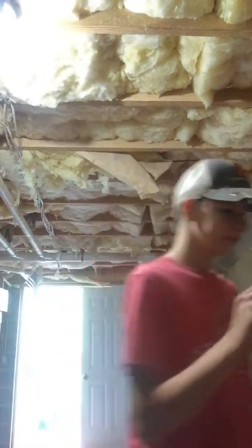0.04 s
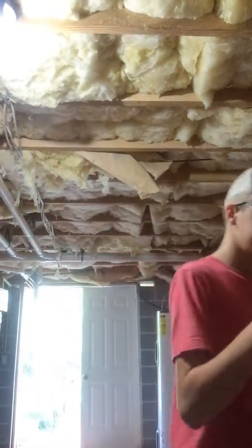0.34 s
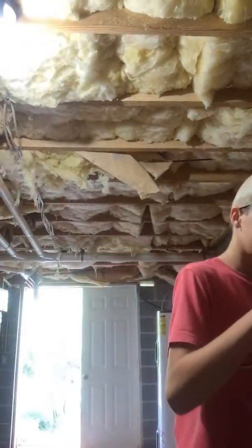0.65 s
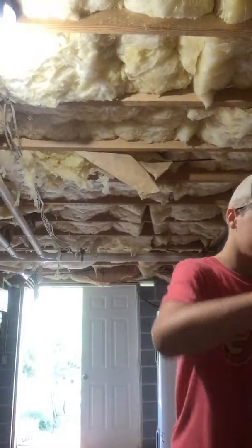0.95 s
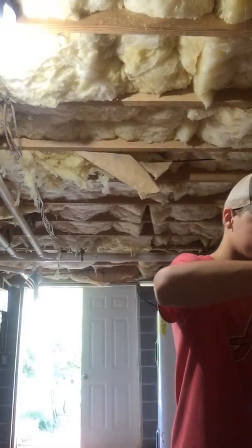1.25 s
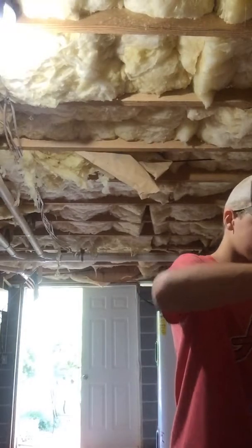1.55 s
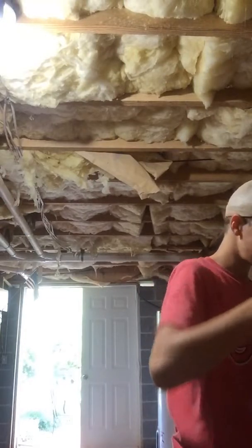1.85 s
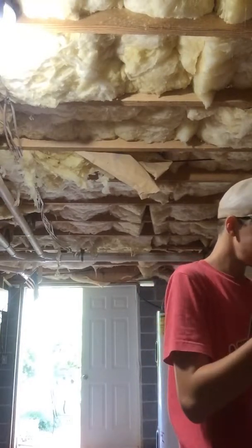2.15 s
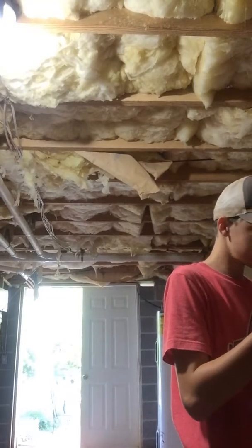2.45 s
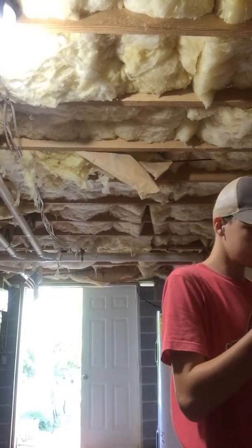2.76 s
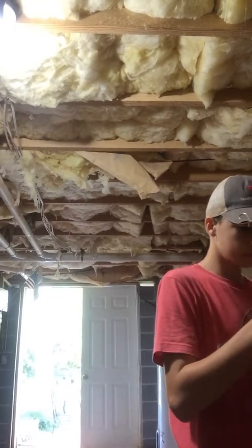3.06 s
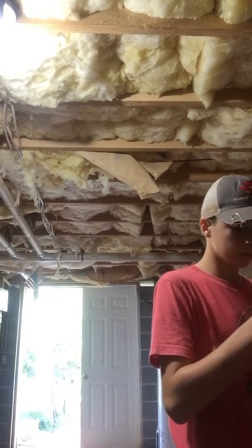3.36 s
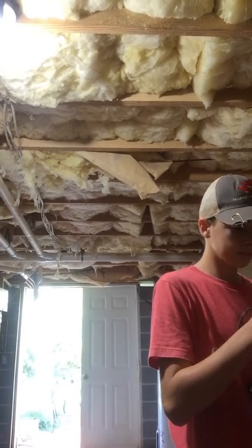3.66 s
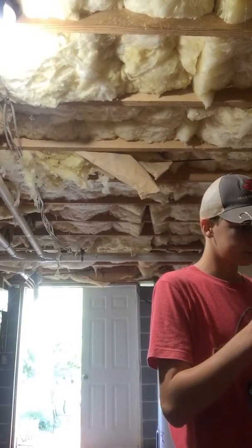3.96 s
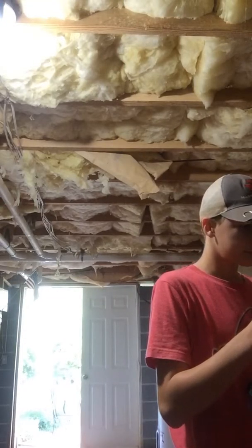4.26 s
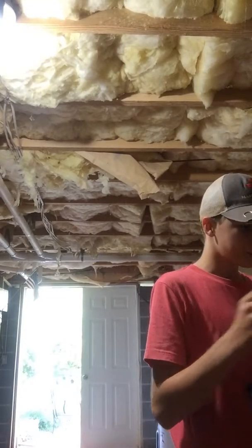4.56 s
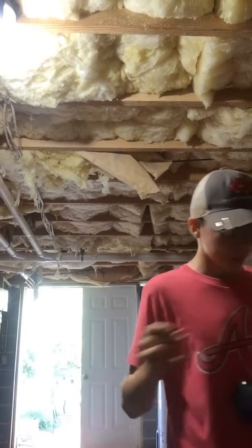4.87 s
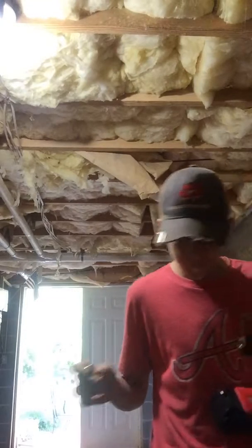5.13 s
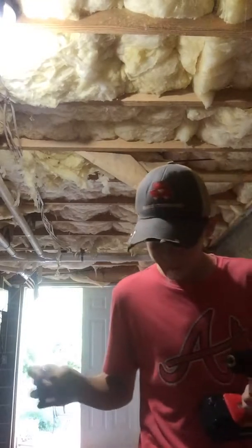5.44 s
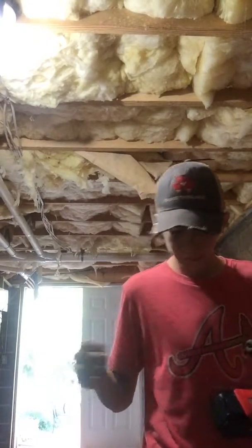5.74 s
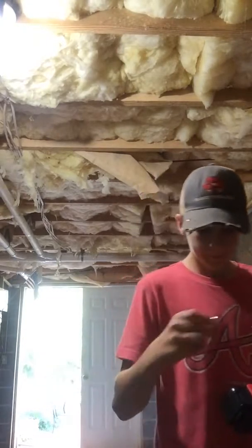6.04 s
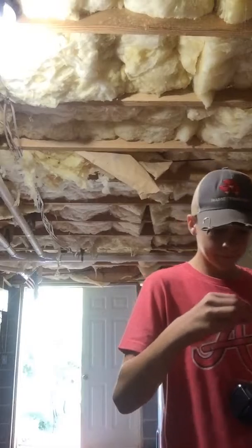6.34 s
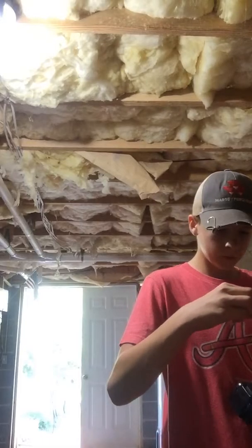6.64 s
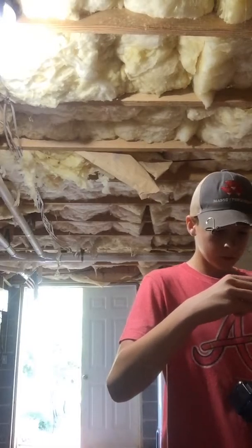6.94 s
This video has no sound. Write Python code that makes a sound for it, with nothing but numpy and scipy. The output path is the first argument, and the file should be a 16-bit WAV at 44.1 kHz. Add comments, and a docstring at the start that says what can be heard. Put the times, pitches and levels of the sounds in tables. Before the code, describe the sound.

Someone rummages briefly through steel tools, with scattered light clicks, one solid thunk on a workbench and a ringing wrench clack.

```python
"""A toolbox is knocked and rummaged in a small basement workshop, an arm's length from a phone.
Steel sockets clink, a wrench and a handle clack, small parts tick, and one heavy tool lands on the bench.
Each blow is a damped knock plus the object's ringing modes; small parts only knock.
Sliding, scraping and rustling are dense friction slips; shifted weight thuds softly.
The insulated ceiling keeps the reverb short, over faint hiss and mains hum."""
import sys
import numpy as np
from scipy import signal
from scipy.fft import rfft, irfft
from scipy.io import wavfile

SR = 44100
rng = np.random.default_rng(int(sys.argv[2]) if len(sys.argv) > 2 else 0)


def log_audio(samples):
    """Write samples as a 16-bit WAV file to the path given in sys.argv[1]."""
    # one column per channel
    frames = np.atleast_2d(samples).T
    # limit to full scale, then quantise
    limited = np.clip(frames, -1, 1)
    pcm = np.round(limited * 32767).astype(np.int16)
    wavfile.write(sys.argv[1], SR, pcm)


N = 308660
BLOW_N = 16384
TIME_S = np.arange(N) / SR
AGE_S = np.arange(BLOW_N) / SR


def undb(db):
    """Decibels to gain."""
    return 10 ** (np.asarray(db) / 20)


def unit(x):
    """Scale to unit energy."""
    return x / np.sqrt(np.sum(x ** 2))


def add(out, time_s, x):
    """Mix x in at time_s."""
    i = max(int(time_s * SR), 0)
    out[i:i + len(x)] += x[:max(N - i, 0)]


def bins_hz(size=BLOW_N):
    """FFT bin frequencies, floored at 1 Hz."""
    return np.maximum(np.arange(size // 2 + 1) * SR / size, 1)


def colour(spectrum, size=BLOW_N):
    """Gain per bin from (Hz, dB) points."""
    hz, db = np.transpose(spectrum)
    return undb(np.interp(np.log(bins_hz(size)), np.log(np.sort(hz)), db))


def resonance(hz, width_oct):
    """Gain per bin of one peak with steep skirts."""
    return 1 / (1 + (np.log2(bins_hz() / hz) / width_oct) ** 2 / 2) ** 2


def min_phase(x, gain):
    """Minimum-phase filter: ringing follows the blow."""
    cepstrum = irfft(np.log(gain + 1e-9))
    cepstrum[1:BLOW_N // 2] *= 2
    cepstrum[BLOW_N // 2 + 1:] = 0
    return irfft(rfft(x) * np.exp(rfft(cepstrum)))


def decay(t60_s):
    """Exponential decay."""
    return np.exp(-np.log(1000) * AGE_S / t60_s)


def contact(crack_db, room_db, chatter_db=2, split_hz=3000):
    """Crack with brief chatter, nearby scatter and a room tail whose treble dies first."""
    chatter, near, far = rng.standard_normal((3, BLOW_N))
    crack = unit((AGE_S == 0) + undb(chatter_db) * unit(chatter * decay(t60_s=0.016)))
    scatter = unit(near * decay(t60_s=0.04))
    low = irfft(rfft(far) / (1 + (bins_hz() / split_hz) ** 2))
    tail = low * decay(t60_s=0.18) + (far - low) * decay(t60_s=0.11)
    room = unit(tail * (1 - decay(t60_s=0.018)))
    return undb(crack_db) * crack + unit(undb(room_db) * room + scatter)


# Bench top, wall and joist reflections: (delay [s], level [dB])
ECHOES = [(.0068, -14), (0.0111, -13), (0.0191, -17.5)]

def knock(body_gain, crack_db, room_db):
    """One contact through a damped body, with early echoes; energy of 10 ms at unit rms."""
    comb = 1 + sum(undb(db) * np.exp(-2j * np.pi * bins_hz() * delay_s) for delay_s, db in ECHOES)
    direct = min_phase(contact(crack_db, room_db), body_gain)
    return unit(irfft(rfft(direct) * comb)) * np.sqrt(SR / 100)


def struck(blows, body, modes, room_db, detune=0.00058):
    """Knock plus ringing modes per blow; softer contact (lower cutoff) dulls both."""
    out = np.zeros(N)
    for time_s, db, cutoff_hz, ring_db, crack_db in blows:
        body_gain = colour(body) / np.hypot(1, (bins_hz() / cutoff_hz) ** 2)
        sound = knock(body_gain, crack_db, room_db)
        for k, (hz, mode_db, t60_s) in enumerate(modes):
            cycles = hz * (1 + detune * rng.standard_normal()) * AGE_S
            ring = np.sin(2 * np.pi * cycles) * (1 - np.exp(-2 * cycles)) * decay(t60_s)
            gain = undb(ring_db + mode_db) / np.hypot(1, (hz / cutoff_hz) ** 2)
            sound += (-1) ** k * gain * ring  # alternate signs: close pairs swell and beat
        add(out, time_s, undb(db) * sound)
    return out


def effort(strokes, attack_s, release_s, sag_db_per_s):
    """Stroke force: swell, sag, release; attack and release times span 20 dB."""
    force = np.zeros(N)
    for peak_s, length_s, db in strokes:
        before = np.maximum(peak_s - TIME_S, 0) / attack_s
        after = np.maximum(TIME_S - peak_s - length_s, 0) / release_s
        sag_db = sag_db_per_s * np.clip(TIME_S - peak_s, 0, length_s)
        force += undb(db - sag_db - 20 * (before + after))
    return force


def friction(force, spectrum, grit_db, slips_per_s):
    """Dense, uneven slips excite the rubbed surface."""
    slips = (rng.random(N) < slips_per_s / SR) * rng.standard_normal(N)
    slips *= undb(grit_db * rng.standard_normal(N))
    rub = irfft(rfft(slips) * colour(spectrum, N), N)
    return rub / rub.std() * force


# Toolbox hits: (time [s], level [dB], cutoff [Hz], ring [dB], crack [dB])
BOX_BLOWS = [(.7412, -29, 5530, -7, -3.5), (.7445, -33, 2840, -20, -8), (.752, -45, 3500, -28, 14),
             (1.4645, -37.5, 2000, 2, -7), (1.496, -40.5, 1900, 2.5, 7), (1.507, -50.5, 2200, 9.5, -17),
             (1.533, -40, 6000, -17, -4)]
# Damped response: (frequency [Hz], level [dB])
BOX_BODY = [(180, -28), (270, -45.5), (350, -1.5), (600, -6), (1100, -1), (1420, -4), (1680, 9), (2000, 1),
            (3000, 0), (4800, -11), (7000, -15.5), (10000, -27), (15000, -29)]
# Ringing modes: (frequency [Hz], level [dB], T60 [s])
BOX_MODES = [(376.7, -10, 0.28), (649, -15.5, 0.33), (834, -10, 0.19), (1050, -17, 0.24), (1121, -7, 0.17),
             (1317, -1, 0.13), (1450, -15, 0.1), (1517, -1, 0.075), (1584, 1.5, 0.085), (1676, 0, 0.11),
             (1826, -0.5, 0.096), (2265, -7, 0.13), (2430, -15.5, 0.24), (2690, -13, 0.17),
             (3110, -12, 0.19)]

def toolbox():
    """The knocked box rings in a cluster of midrange modes."""
    return struck(BOX_BLOWS, BOX_BODY, BOX_MODES, room_db=1)


# Bench hits: (time [s], level [dB], cutoff [Hz], ring [dB], crack [dB])
BENCH_BLOWS = [(5.5772, -27, 14000, -1, -5.5), (5.5795, -35.5, 14100, -23, 2),
               (5.589, -32, 5980, -29.5, -2)]
# Damped response: (frequency [Hz], level [dB])
BENCH_BODY = [(155, -25), (205, 4), (400, 6), (700, -2), (1100, -11.5), (1700, -2.5), (2400, -8.5),
              (3100, -8.5), (4500, -8.5), (6200, -5.5), (7800, -19.5), (15000, -27)]
# Ringing modes: (frequency [Hz], level [dB], T60 [s])
BENCH_MODES = [(206, 6.5, 0.17), (229.4, 11, 0.11), (259, -9, 0.21), (304, -0.5, 0.12), (409, 1, 0.15),
               (445, -19.5, 0.37), (545, -11, 0.17), (560, -15, 0.25), (637, -5, 0.13), (841, -14.5, 0.14),
               (1500, -7.5, 0.069), (1730, -10, 0.084), (2370, -13.5, 0.12), (3130, -2.5, 0.039),
               (5900, -5, 0.064), (6100, 1, 0.048)]

def bench():
    """A heavy tool lands in three quick contacts, driving the bench's low modes."""
    return struck(BENCH_BLOWS, BENCH_BODY, BENCH_MODES, room_db=-4)


# Socket hits: (time [s], level [dB], cutoff [Hz], ring [dB], crack [dB])
SOCKET_BLOWS = [(1.3345, -53.5, 10000, -2, -3), (1.3667, -61.5, 8900, -4, 10),
                (1.4745, -39.5, 14000, -2, 4), (1.507, -45, 12000, 11, -1), (1.5373, -52, 8000, -6, -1),
                (1.5877, -46, 12200, 8, 1), (1.6575, -47, 10000, -5, 2), (1.663, -45, 9000, -7, -3),
                (1.7139, -46.5, 12000, -2, 0), (2.8255, -58.5, 12000, 16.5, -12),
                (2.965, -77, 10000, 24, -6), (6.617, -68, 10000, -2, 7), (6.8015, -59, 4970, 3, -6)]
# Damped response: (frequency [Hz], level [dB])
SOCKET_BODY = [(300, -27), (2000, -8), (3300, -3), (5000, 4.5), (7000, 4.5), (8300, -7), (9700, 11.5),
               (10350, 25), (11100, -1.5), (15000, -30)]
# Ringing modes: (frequency [Hz], level [dB], T60 [s])
SOCKET_MODES = [(10307, -1, 0.14), (10220, -7.5, 0.11), (10030, -16, 0.027)]

def sockets():
    """Steel sockets clink; close modes beat near 10 kHz."""
    return struck(SOCKET_BLOWS, SOCKET_BODY, SOCKET_MODES, room_db=-9)


# Wrench hits: (time [s], level [dB], cutoff [Hz], ring [dB], crack [dB])
WRENCH_BLOWS = [(2.9648, -46.5, 8900, -9.5, -4), (6.7945, -38, 9100, -2, 7.5), (6.8015, -39, 9000, -1, 2)]
# Damped response: (frequency [Hz], level [dB])
WRENCH_BODY = [(180, -34), (350, -21), (850, -14), (1500, -11), (2100, -15), (3100, -6.5), (3600, -10),
               (4400, -5.5), (5600, -24.5), (6600, -17.5), (9500, -31), (15000, -32)]
# Ringing modes: (frequency [Hz], level [dB], T60 [s])
WRENCH_MODES = [(321, -17, 0.22), (766, -7.5, 0.091), (893, -16.5, 0.2), (2360, -3.5, 0.13),
                (2620, -16, 0.054), (2884, 0.5, 0.13), (3030, -5, 0.12), (3110, -7, 0.16),
                (3218, 11.5, 0.11), (3110, -2, 0.08), (3950, -36, .1), (4160, -7, 0.13), (4540, -17, 0.11),
                (4480, -15, .13)]

def wrench():
    """A wrench clacks and rings near 3 kHz."""
    return struck(WRENCH_BLOWS, WRENCH_BODY, WRENCH_MODES, room_db=-2)


# Handle hits: (time [s], level [dB], cutoff [Hz], ring [dB], crack [dB])
HANDLE_BLOWS = [(.654, -54, 1730, -2, -21), (2.8252, -48.5, 7950, -9, -5), (2.8355, -56, 8950, -21, 3),
                (2.8893, -58, 12000, -8, 5), (6.6122, -55.5, 4600, -3.5, 17)]
# Damped response: (frequency [Hz], level [dB])
HANDLE_BODY = [(200, -42), (320, 5), (750, -1.5), (1000, 4), (2100, 3.5), (3700, 4.5), (4400, -4.5),
               (8000, -8), (15000, -14)]
# Ringing modes: (frequency [Hz], level [dB], T60 [s])
HANDLE_MODES = [(930, -6.5, 0.24), (990, -7.5, 0.31), (1120, -6, 0.1), (1483, -0.5, 0.081),
                (2400, 2, 0.079), (3050, -12, 0.11), (3230, 2, 0.074), (3505, -1, 0.14), (3880, 5, 0.071)]

def handle():
    """A tool handle takes light knocks and rings briefly."""
    return struck(HANDLE_BLOWS, HANDLE_BODY, HANDLE_MODES, room_db=6)


# Small-part contacts, plus two dull handle knocks near 6.69 s: (time [s], level [dB], centre [Hz], width [oct],
# crack [dB])
TAPS = [(0.5125, -54, 6750, 0.28, 15), (0.6522, -50, 6100, 0.48, 1), (0.7368, -46, 5700, 0.79, 1),
        (0.7417, -42.5, 6800, 0.3, 20), (0.8233, -59.5, 6100, .29, 5), (1.166, -57, 5550, 0.43, -1),
        (1.4471, -49, 6360, 0.29, -6), (1.453, -47.5, 6000, 0.88, -12), (1.623, -55, 5660, 0.79, -5),
        (1.812, -53.5, 404, 0.28, -10), (2.326, -59.5, 2390, 0.12, 17), (2.966, -59, 560, 0.27, -2),
        (3.1102, -49.5, 1610, 0.43, 7), (5.991, -64.5, 4470, 1, 14), (6.0548, -48.5, 5800, 2.1, 3),
        (6.677, -66.5, 1020, .15, 2), (6.695, -65, 1020, 0.17, 5)]

def taps():
    """Small parts touch in the hand or box, too damped to ring; the handle also takes two dull knocks near 6.69
    s."""
    out = np.zeros(N)
    for time_s, db, hz, width_oct, crack_db in TAPS:
        add(out, time_s, undb(db) * knock(resonance(hz, width_oct), crack_db, room_db=-3))
    return out


# Tool drag: (peak time [s], length [s], level [dB])
SLIDE_STROKES = [(.41, 0.12, -55)]
# Rubbed surface: (frequency [Hz], level [dB])
SLIDE_SPECTRUM = [(120, -9), (200, 0.5), (300, -6.5), (700, -8), (1150, -2.5), (1360, 6), (1600, -4.5),
                  (2600, -5.5), (3900, -7), (4900, -13), (6200, -11), (10000, -26), (15000, -36)]

def tool_slide():
    """A tool is dragged over a surface in fine slips."""
    force = effort(SLIDE_STROKES, attack_s=0.18, release_s=0.051, sag_db_per_s=53)
    return friction(force, SLIDE_SPECTRUM, grit_db=0, slips_per_s=4000)


# Pushes on the box: (peak time [s], length [s], level [dB])
SHIFT_STROKES = [(1.33, 0.045, -72), (1.495, 0.18, -51)]
# Grinding contents: (frequency [Hz], level [dB])
SHIFT_SPECTRUM = [(150, -13), (230, -10.5), (320, 7.5), (470, 9), (650, -7.5), (950, -13.5), (1800, -21),
                  (3000, -32), (6500, -20), (12000, -41)]

def box_shift():
    """The pushed box shifts; its contents grind in coarse slips."""
    force = effort(SHIFT_STROKES, attack_s=0.047, release_s=0.1, sag_db_per_s=15)
    return friction(force, SHIFT_SPECTRUM, grit_db=1.5, slips_per_s=810)


# Stirs in the box: (peak time [s], length [s], level [dB])
SCRAPE_STROKES = [(1.332, 0.035, -61.5), (1.458, 0.031, -48), (1.61, 0.11, -66.5)]
# Steel on steel: (frequency [Hz], level [dB])
SCRAPE_SPECTRUM = [(500, -3.5), (2800, -2.5), (4000, 1), (6800, 0), (8300, -8.5), (10300, -13),
                   (12000, -12), (15000, -25)]

def socket_scrape():
    """Stirred sockets rub past each other."""
    force = effort(SCRAPE_STROKES, attack_s=0.028, release_s=0.048, sag_db_per_s=10)
    return friction(force, SCRAPE_SPECTRUM, grit_db=2, slips_per_s=3600)


def rattle(start_s=1.43, length_s=0.38, count=7, centre_hz=4200, max_db=-63, range_db=6):
    """Loose parts tick at random during the rummage."""
    out = np.zeros(N)
    for k, (jitter, strength, pitch) in enumerate(rng.random((count, 3))):
        body_gain = resonance(centre_hz * 2 ** (pitch - 0.5), width_oct=1)
        tick = knock(body_gain, crack_db=-4, room_db=-3)
        db = max_db - range_db * (1 - strength)
        add(out, start_s + length_s * (k + jitter) / count, undb(db) * tick)
    return out


# Handling bumps: (time [s], level [dB])
THUDS = [(0.678, -58.5), (0.74, -59), (1.011, -63.5), (1.329, -62), (1.499, -62), (1.702, -66)]

def thuds():
    """Soft, low bumps as weight is moved about."""
    out = np.zeros(N)
    for time_s, db in THUDS:
        burst = rng.standard_normal(BLOW_N) * decay(t60_s=0.55)
        bump = min_phase(burst, resonance(hz=100, width_oct=0.48))
        add(out, time_s, undb(db) * unit(bump) * np.sqrt(SR / 20))
    return out


# Arm movements: (peak time [s], length [s], level [dB])
RUSTLE_STROKES = [(0, 0.13, -69.5), (.8, 0.24, -75.5), (1.14, .03, -70), (5.28, 0.25, -82),
                  (5.7, 0.39, -73.5)]
# Cloth: (frequency [Hz], level [dB])
RUSTLE_SPECTRUM = [(150, -6), (500, 4.5), (1200, -0.5), (3000, -6), (6000, -11), (12000, -29)]

def clothes():
    """Cloth rubs faintly as the arms move."""
    force = effort(RUSTLE_STROKES, attack_s=0.19, release_s=0.21, sag_db_per_s=2)
    return friction(force, RUSTLE_SPECTRUM, grit_db=3, slips_per_s=3000)


# Room noise: (frequency [Hz], level [dB])
AIR_SPECTRUM = [(20, -28), (33, -4), (55, -1.5), (100, 5), (200, -1), (500, -4.5), (1500, -8),
                (4000, -11.5), (4950, -14.5), (6100, -13), (6750, -1.5), (8200, -15), (9300, -17),
                (10400, -20), (15000, -22.5)]

def room_air(rms_db=-68.5):
    """Steady room noise with a narrow band of hiss."""
    air = irfft(rfft(rng.standard_normal(N)) * colour(AIR_SPECTRUM, N), N)
    return undb(rms_db) * air / air.std()


# Mains tones: (frequency [Hz], rms level [dB])
HUM_TONES = [(59, -80), (120, -74.5)]

def mains_hum(waver=0.36):
    """Two mains tones whose level wavers slowly."""
    sway = np.interp(TIME_S, np.linspace(0, TIME_S[-1], 40), rng.standard_normal(40))
    hum = sum(undb(db) * np.sqrt(2) * np.sin(2 * np.pi * hz * TIME_S) for hz, db in HUM_TONES)
    return hum * (1 + waver * sway)


def scene():
    """Tool handling over the quiet room, mono."""
    blows = toolbox() + bench() + sockets() + wrench() + handle() + taps()
    rubbing = tool_slide() + box_shift() + socket_scrape()
    handling = rattle() + thuds() + clothes()
    return (blows + rubbing + handling + room_air() + mains_hum())[None]


def record(dry, cutoff_hz=15800):
    """The phone cuts the top of the treble."""
    return signal.sosfilt(signal.ellip(10, 0.2, 70, cutoff_hz, fs=SR, output="sos"), dry)


dry = scene()
out = record(dry)
log_audio(out)
```